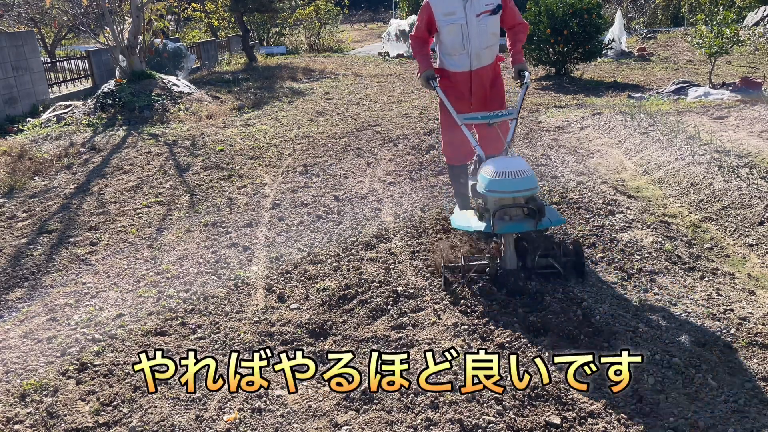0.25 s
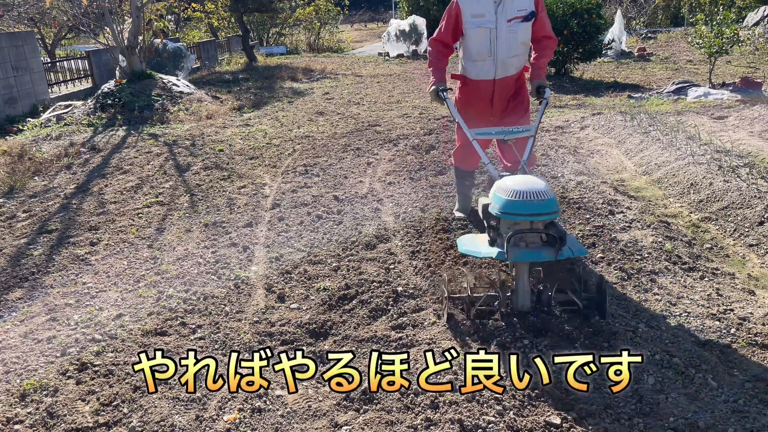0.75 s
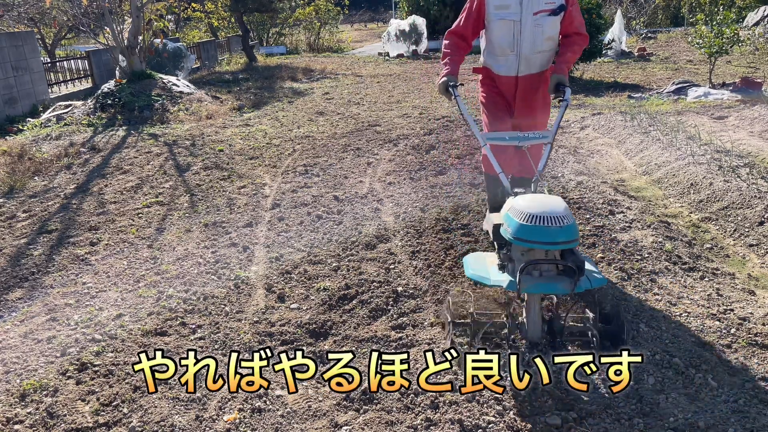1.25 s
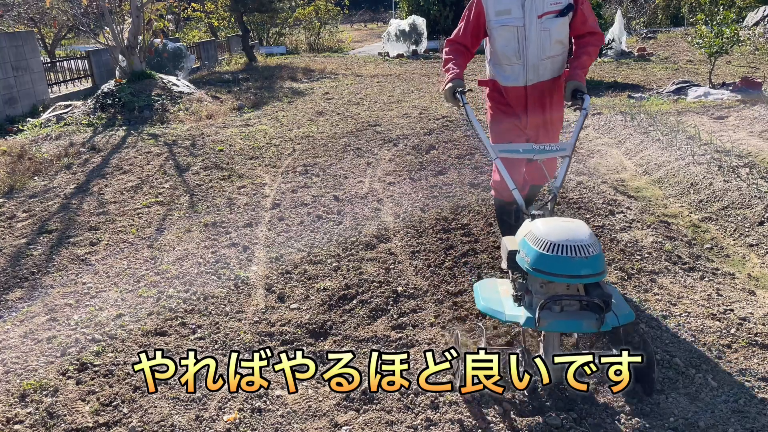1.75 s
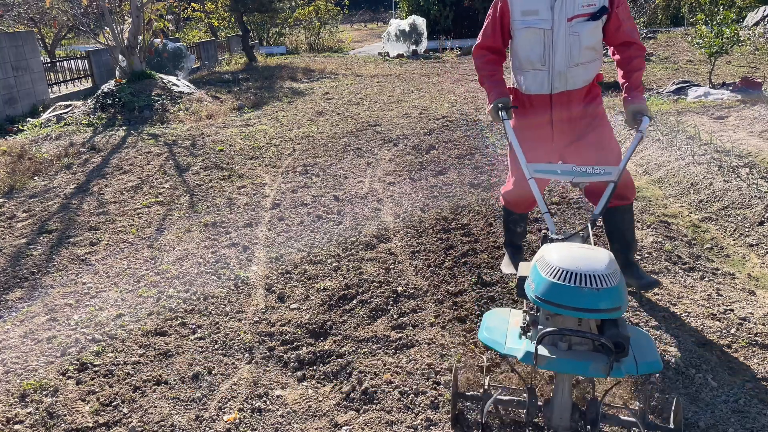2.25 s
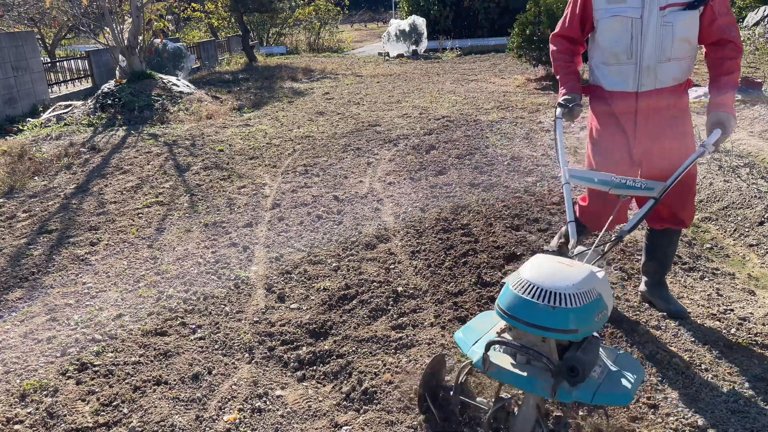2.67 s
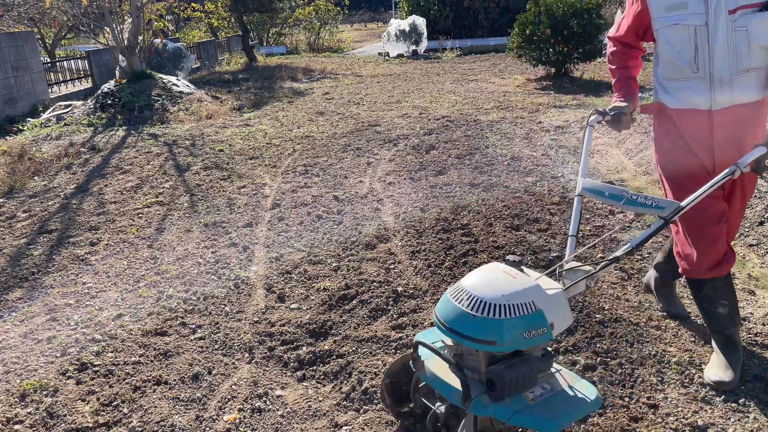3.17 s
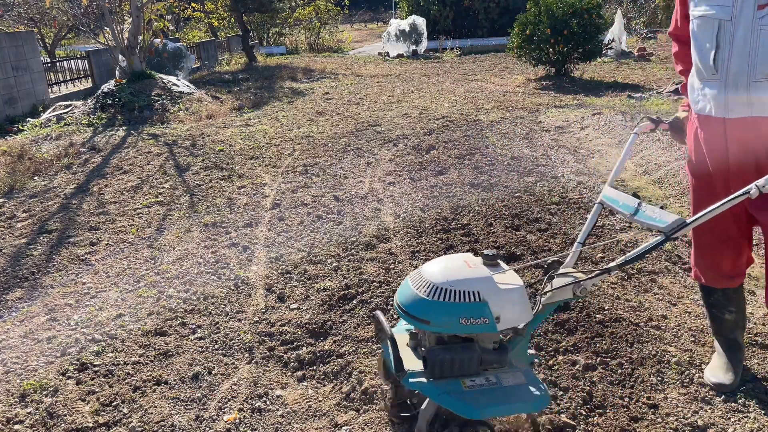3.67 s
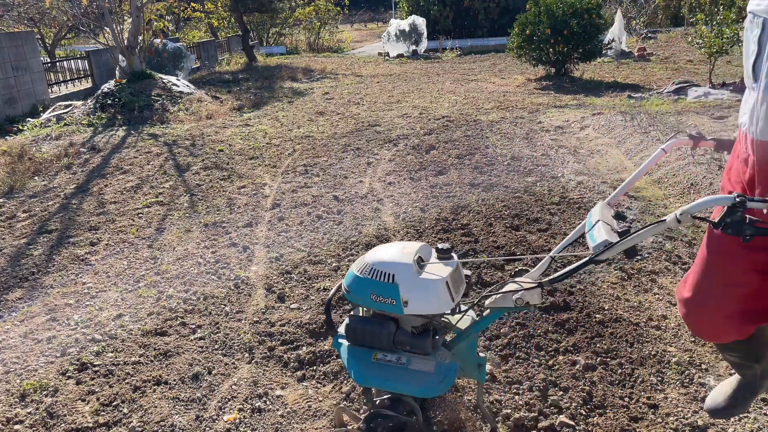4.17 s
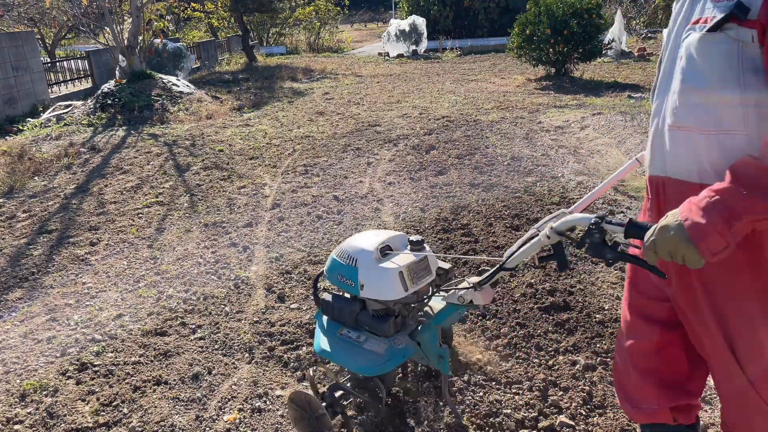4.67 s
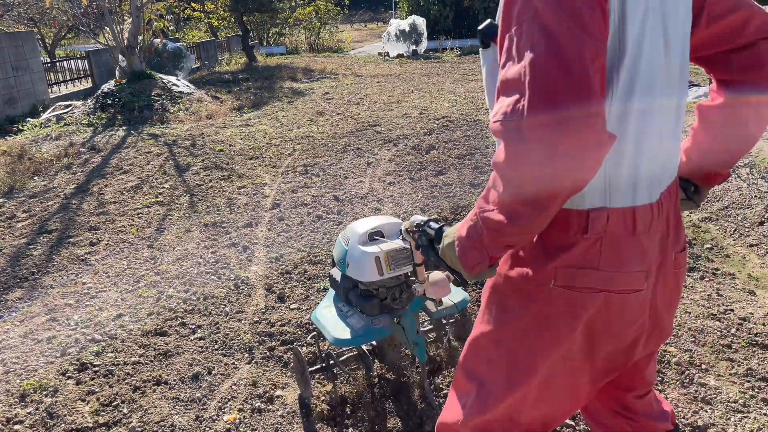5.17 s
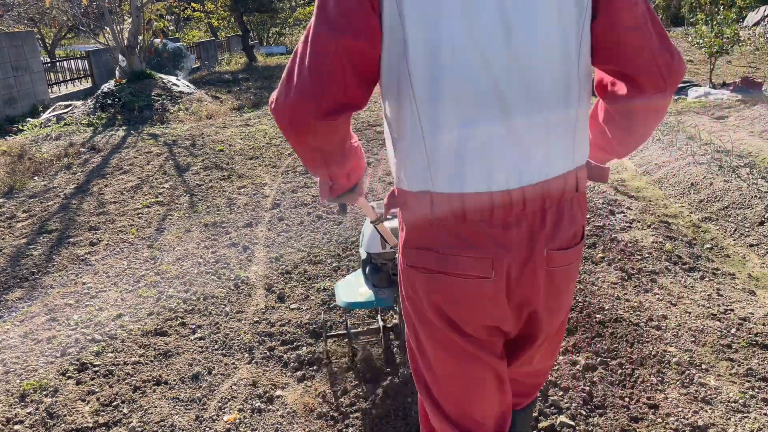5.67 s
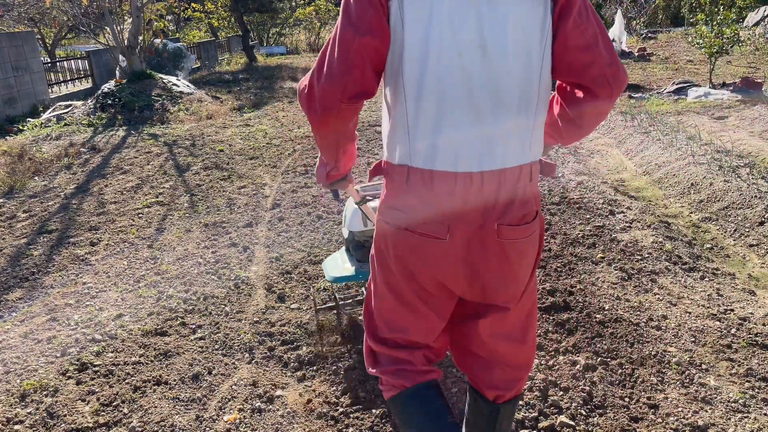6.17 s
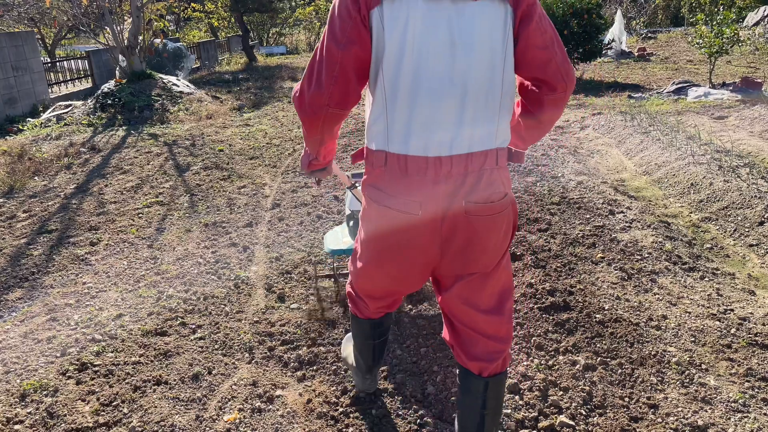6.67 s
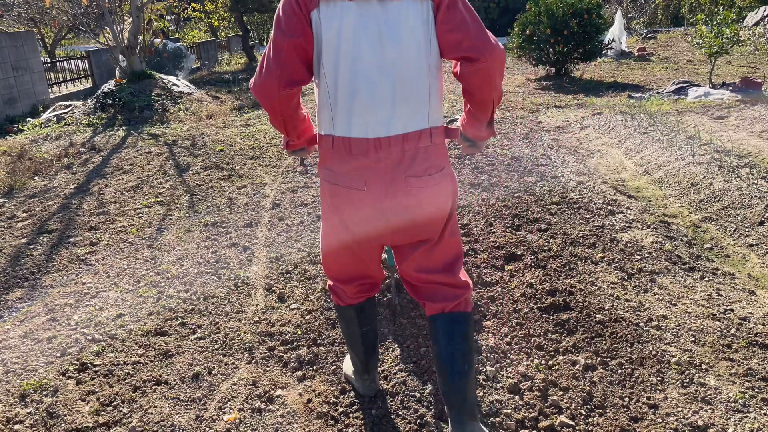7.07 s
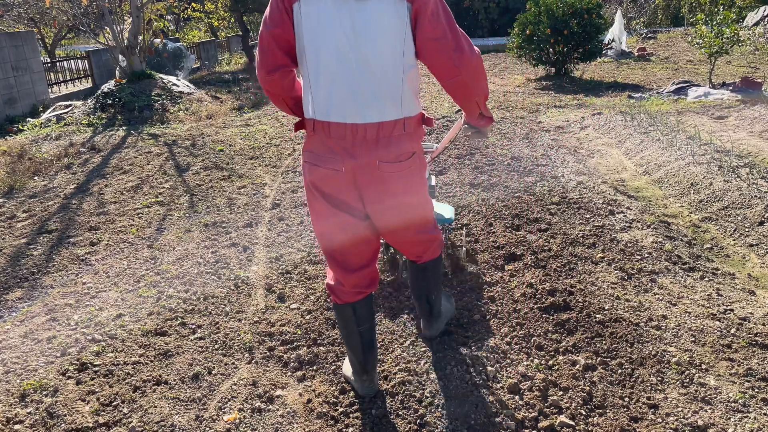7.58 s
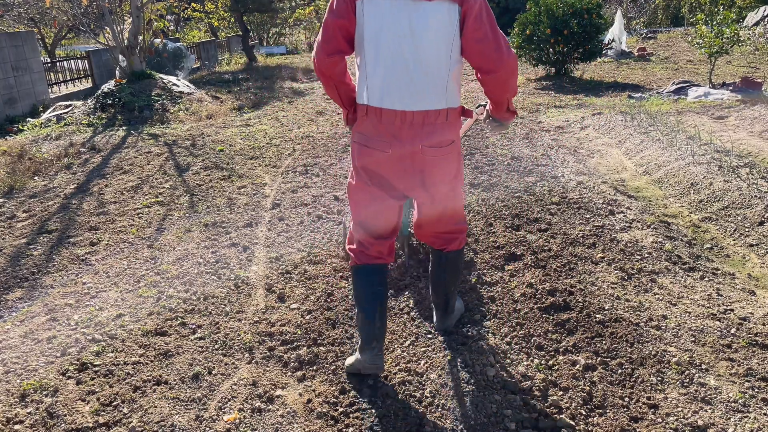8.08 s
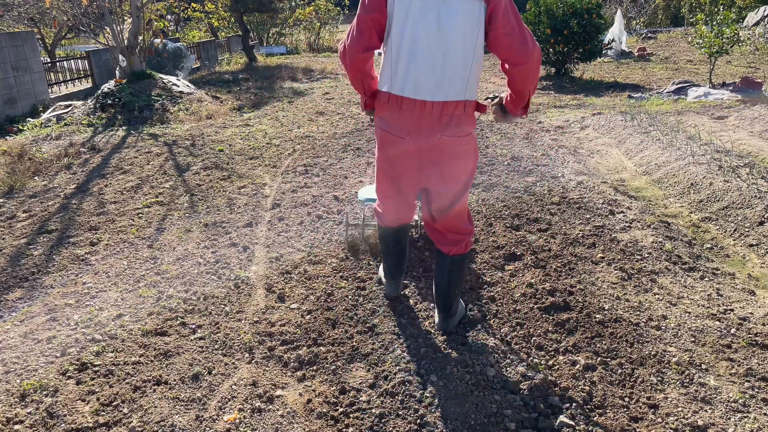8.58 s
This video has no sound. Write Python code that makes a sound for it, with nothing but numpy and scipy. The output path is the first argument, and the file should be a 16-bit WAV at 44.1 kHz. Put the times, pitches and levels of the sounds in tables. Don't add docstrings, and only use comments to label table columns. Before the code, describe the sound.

Rapid single-cylinder engine putter with metallic rattle approaches, cracks brightest as the tiller turns near three seconds, then recedes, quieter and muffled.

```python
import sys
import numpy as np
from scipy import signal
from scipy.fft import rfft, irfft, next_fast_len
from scipy.io import wavfile
from scipy.ndimage import uniform_filter1d

SR = 44100
rng = np.random.default_rng(int(sys.argv[2]) if len(sys.argv) > 2 else 0)


def volts_from_db(level):
    exponent = np.asarray(level, float) / 20
    return 10 ** exponent


def wrap_up_sound(samples):
    columns = np.atleast_2d(samples).T
    tamed = np.clip(columns, -1, 1)
    steps = np.round(tamed * 32767).astype(np.int16)
    wavfile.write(sys.argv[1], SR, steps)


N = 389403
TIME_S = np.arange(N) / SR
SIZE = next_fast_len(N + 2048)
BINS_HZ = np.maximum(np.fft.rfftfreq(SIZE, 1 / SR), 1)


def rms_one(x):
    return x / np.sqrt(np.mean(x ** 2) + 1e-20)


def in_time(rows):
    s, *columns = np.transpose(rows)
    return [np.interp(TIME_S, s, column) for column in columns]


def at_hz(points, hz, column=1):
    points = np.array(points)
    return np.interp(np.log(hz), np.log(points[:, 0]), points[:, column])


def drift(rate_hz):
    r = np.exp(-80 * np.pi * rate_hz / SR)
    slow = signal.lfilter([1], [1, -2 * r, r * r], rng.standard_normal(N // 40 + 2002))
    slow = rms_one(slow[2000:])
    return np.interp(np.arange(N) / 40, np.arange(len(slow)), slow)


# (time [s], casing loudness [dB], tail pipe toward us [0-1], broadside [0-1], hidden by the driver [0-1])
POSE = [(0, -0.5, 0, .1, 0.06), (.7, 0.5, 0.15, 0.11, 0.09), (1.701, 2, 0.12, 0.02, 0.03),
        (2.301, 2, 0.33, 0, 0), (2.9, 3, 0.78, 0.14, 0.11), (3.5, 3.5, 0.69, 0.14, 0.22),
        (4.101, 0.5, 0.74, 0.75, 0.36), (4.8, -0.5, 0.34, 0.8, 0.4), (5.3, -4.5, 0.37, 0.85, 0.04),
        (5.8, -4.5, 0.44, 0.6, 0.92), (6.2, -4.5, 0.05, 0.7, 0.7), (6.6, -4, 0.26, 0.23, 0.8),
        (7.1, -5, 0.17, 0, 0.85), (7.8, -4, 0.2, 0.06, 0.84), (8.55, -4, 0.28, 0.21, 0.96),
        (8.83, -3.5, 0, 0.04, 0.63)]


def posed(head_on, toward, broadside, hidden, power=1):
    s, casing_db, *pose = np.transpose(POSE)
    shares = np.clip(pose, 0, 1.2) ** power
    return np.interp(TIME_S, s, head_on + np.dot([toward, broadside, hidden], shares))


# (time [s], firing rate [firings/s])
SPEED = [(0.0, 30.36), (0.45, 30.66), (1.27, 29.6), (1.62, 31.26), (1.91, 29.8), (2.03, 30.22),
         (3.94, 30.55), (4.05, 29.53), (4.59, 30.6), (4.91, 29.97), (5.84, 30.31), (6.21, 31.36),
         (6.57, 30.26), (6.91, 30.52), (7.06, 29.43), (7.79, 31.0), (8.23, 29.76), (8.83, 30.35)]


def firing_cycles():
    tine_turns_per_s, drag_cycles, angle_rad = 2.654, .0073, .28
    first_firing_cycles = -.019
    tines = np.sin(2 * np.pi * tine_turns_per_s * TIME_S + angle_rad)
    return np.cumsum(in_time(SPEED)[0]) / SR - first_firing_cycles + drag_cycles * tines


def burst(cycles, start_ms, crest_ms, hz, width_hz, uneven_db, jitter_ms, order, count=2):
    chance = rng.standard_normal((300, 2))
    speed = np.gradient(cycles) * SR
    out = np.zeros(N)
    for back in range(count):
        index = np.floor(cycles).astype(int) - back
        since_s = (cycles - index) / speed - jitter_ms * chance[index + 1, 0] / 1000
        fade = np.pi * width_hz * np.maximum(since_s - start_ms / 1000, 0)
        tone = np.cos(2 * np.pi * hz * (since_s - crest_ms / 1000))
        strength = volts_from_db(uneven_db * chance[:, 1])[index + 1]
        out += strength * fade ** order * np.exp(-fade) * tone
    return out / np.sqrt(uniform_filter1d(out ** 2, SR // 2))


# (time [s], level [dB])
BOOM_LEVEL = [(0.0, -14), (0.05, -15.5), (0.42, -14), (1.62, -14), (3.1, -16), (4.1, -20.5), (5.09, -22),
              (6.71, -19.5), (8.73, -20.5), (8.83, -19.5)]


def exhaust(cycles):
    boom = burst(cycles, start_ms=posed(0.77, -1.6, 4.16, 0.31), crest_ms=10.1, hz=posed(171.5, -6, -21, -2),
                 width_hz=posed(180.5, -27, 35, -38.5), uneven_db=.3, jitter_ms=.04, order=4)
    chamber = burst(cycles, 6.0, 14.4, hz=242, width_hz=72, uneven_db=.8, jitter_ms=.06, order=1)
    upper = burst(cycles, 4.2, 12.36, hz=posed(378.5, -6, 22, 41), width_hz=140,
                  uneven_db=0.53, jitter_ms=0.14, order=1, count=1)
    upper = volts_from_db(posed(-10, -4, -5, 8.5)) * upper
    intake = burst(cycles, 26, 32.2, hz=230, width_hz=170, uneven_db=1.2, jitter_ms=.1, order=2)

    third_under_db = posed(19.5, 14, -20.5, 3.7)
    third_lag = np.interp(third_under_db, [13, 21], [.395, .315])
    crank = np.sqrt(2) * np.cos(4 * np.pi * (cycles - .232))
    third = np.sqrt(2) * np.cos(6 * np.pi * (cycles - third_lag))

    parts = volts_from_db(2.5 - posed(15.5, 7.5, -6.8, -2)) * (upper - chamber)
    parts += volts_from_db(-posed(10, -2, 9, 0.5)) * crank
    parts += volts_from_db(-third_under_db) * third
    parts += volts_from_db(-posed(26, 7.2, 7, -17.5)) * intake
    return volts_from_db(in_time(BOOM_LEVEL)[0] + 0.52) * (boom + parts)


# (time [s], peak level [dB])
HARD_FIRINGS = [(2.705, -9), (2.771, -2), (3.034, 6), (3.099, 2), (3.133, -6), (3.265, -11), (3.364, -13),
                (3.431, -2), (3.528, -11), (3.789, -10), (3.822, -14), (3.854, -5), (3.887, -6), (3.92, -1),
                (3.987, -7), (4.02, -5), (4.088, -7), (4.121, 2), (4.155, -7), (4.355, -3), (4.52, -5),
                (4.685, -14), (7.357, -14)]


def crack_and_pop(cycles):
    crack = burst(cycles, 1.7, 1.75, hz=830, width_hz=380, uneven_db=1.3, jitter_ms=.08, order=1, count=1)
    snap = burst(cycles, 2.2, 2.5, hz=1700, width_hz=1500, uneven_db=3.0, jitter_ms=.1, order=1, count=1)
    pop = burst(cycles, start_ms=posed(10.02, 0.33, 0.083, 0.15), crest_ms=11.15, hz=posed(585, -32, 0, 70),
                width_hz=posed(250, -100, 60, 20), uneven_db=1.0, jitter_ms=.05, order=1, count=1)

    s, peak_db = np.transpose(HARD_FIRINGS)
    hard_index = cycles[(s * SR).astype(int) + 200].astype(int)
    extra_db = np.zeros(300)
    extra_db[hard_index] = 3.5 + .5 * (peak_db - np.median(peak_db)).clip(-2, 4)
    crack_db = posed(-32, 2, -0.5, -0.5, power=1.9) + extra_db[cycles.astype(int)] + .8
    pop_db = posed(-33.5, 6.5, -3, -1.3) + 2.2

    casing_db = in_time(POSE)[0]
    return volts_from_db(casing_db) * (volts_from_db(pop_db) * pop - volts_from_db(crack_db) * (crack + volts_from_db(-11) * snap))


def shaking(cycles):
    white = rng.standard_normal((2, SIZE))
    struck = rng.random(SIZE) < 1500 / SR
    knock_db = 3.5 * np.minimum(rng.exponential(1, SIZE), 4)
    knocks = struck * volts_from_db(knock_db) * np.sign(white)
    shake = white + .45 * rms_one(knocks)

    turn = (cycles - .065) % 1
    contacts = signal.lfilter([1], [1, -.8], rng.standard_normal(1456))
    shake[0, :N] += .1 * contacts[(turn * 1456).astype(int)]
    firing = np.exp(-turn / 0.099) + 1.6 * np.exp(-((turn - .5) % 1) / 0.011)
    return shake, firing


# (frequency [Hz], gain with pipe toward us [dB], gain broadside [dB], loss when hidden [dB])
REGIONS = [(424, 6.5, 3.5, 7.5), (720, -9, 1, -3), (1400, -2.3, -0.5, 7.5), (3240, 2.5, 5.5, 2),
           (5500, 0, 4, 5), (8000, 0.5, 2.5, 2.5), (13000, -3.5, 3, 9)]


def region_level(hz):
    casing_db, toward, broadside, hidden = in_time(POSE)
    level_db = casing_db + at_hz(REGIONS, hz) * toward
    level_db += at_hz(REGIONS, hz, column=2) * broadside
    level_db -= at_hz(REGIONS, hz, column=3) * hidden
    return level_db - np.mean(level_db)


# (frequency [Hz], spectral level [dB])
COLOUR = [(40, -30), (170, -20.5), (310, -15), (420, -9), (600, -2.5), (950, -8.5), (1120, -16),
          (1350, -10), (1650, -11), (2200, -11), (3500, -12.5), (6000, -17), (8000, -14), (11000, -23.5),
          (15500, -26)]


def clatter(shake, firing, pan_db):
    alike = at_hz(PORTS, BINS_HZ, column=3)
    mid, side = rfft(shake) * volts_from_db(at_hz(COLOUR, BINS_HZ)) * np.sqrt([1 + alike, 1 - alike])
    ears = np.array([mid + side, mid - side])
    shared = drift(14)
    out = np.zeros((2, N))
    step = np.clip(np.log2(BINS_HZ / 250) * 1.4, 0, 8)
    for k in range(9):
        band = np.cos(np.clip(step - k, -1, 1) * np.pi / 2) ** 2
        gain_db = region_level(250 * 2 ** (k / 1.4))
        gain_db += np.interp(k, [3, 8], [.4, 1.0]) * shared + 1.4 * drift(21.0)
        gain_db += np.interp(k, [1, 8], [2.5, 4.5]) * firing
        out += volts_from_db(gain_db) * irfft(band * ears, SIZE)[:, :N]
        if k == 5:
            out *= volts_from_db(pan_db)
    return volts_from_db(-16.5) * out


# (frequency [Hz], width [Hz], level [dB])
PANELS = [(950, 100, -40), (1250, 80, -40), (1330, 75, -34.5), (1420, 80, -41), (1980, 70, -41),
          (2100, 70, -41), (2280, 65, -41), (2550, 90, -43), (3120, 140, -45), (4360, 170, -50),
          (6000, 200, -52)]


def panels(shake, firing):
    blows = shake[:, :N] * volts_from_db(4.8 * firing)
    out = np.zeros(N)
    for k, (hz, width_hz, level_db) in enumerate(PANELS):
        r = np.exp(-np.pi * width_hz / SR)
        ring = signal.lfilter([1, 0, -1], [1, -2 * r * np.cos(2 * np.pi * hz / SR), r * r], blows[k % 2])
        swell_db = region_level(hz) + 1.6 * drift(1.5) + 1.5 * drift(14)
        out += volts_from_db(level_db + swell_db) * rms_one(ring)
    return out


# (time [s], left-right difference [dB])
PAN = [(0, -1.2), (2, -.9), (3.7, -.6), (4.5, -.1), (6.2, -1.0), (7.2, -.1), (8.83, -.3)]


def direction():
    return in_time(PAN)[0] * [[.5], [-.5]]


# (delay [ms], level [dB], left-right difference [dB])
ECHOES = [
    (9, -21, 12),
    (14, -21, -12),
    (41, -28, 9),
    (58, -28, -9),
]


def echoes(tones):
    dull = signal.sosfilt(signal.butter(2, [210, 2500], "band", fs=SR, output="sos"), tones)
    out = np.zeros((2, N))
    for delay_ms, db, side_db in ECHOES:
        read = np.arange(N) - SR * (delay_ms + 1.05 * drift(0.275)) / 1000
        gain = volts_from_db([[db + side_db / 2], [db - side_db / 2]])
        out += gain * np.interp(read, np.arange(N), dull)
    return out


def ground(x):
    near_dip, far_dip = (315, 50, .45), (540, 55, .55)   # (Hz, width Hz, depth 0-1)
    hidden = np.clip(in_time(POSE)[3] * 1.5, 0, 1)
    for share, (hz, width_hz, depth) in ((1 - hidden, near_dip), (hidden, far_dip)):
        x = x - share * depth * signal.lfilter(*signal.iirpeak(hz, hz / width_hz, fs=SR), x)
    return x


# (time [s], peak level [dB])
TICKS = [(0.2947, -49), (1.0196, -32), (1.2545, -29), (2.0108, -30), (2.7695, -23), (2.8365, -30),
         (2.9033, -28), (3.012, -20), (3.0999, -29), (3.1333, -23), (3.1996, -26), (3.3638, -29),
         (3.432, -23), (3.4625, -25), (3.5922, -25), (3.6581, -26)]


def ticks():
    clicks = np.zeros(N)
    for s, peak_db in TICKS:
        clicks[round(s * SR)] = volts_from_db(peak_db + 8.5)
    fading = signal.lfilter([1], [1, -.985], clicks + 1e-18)
    grit = fading * rng.standard_normal(N)
    return signal.sosfilt(signal.butter(2, 2500, "high", fs=SR, output="sos"), grit)


def scene():
    cycles = firing_cycles()
    pan_db = direction()
    shake, firing = shaking(cycles)
    tones = exhaust(cycles) + crack_and_pop(cycles) + panels(shake, firing)
    machine = tones * volts_from_db(pan_db) + clatter(shake, firing, pan_db) + echoes(tones)
    return ground(machine) + ticks()


# (frequency [Hz], left lag [rad], left-right difference [dB], likeness [0-1])
PORTS = [(150, -.02, 0, .9), (1000, -.1, -.8, .76), (1900, -.16, -.8, .76), (3000, -.7, 2, .74),
         (4300, -.3, 3, .64), (5200, -.55, 4.5, .5), (6100, .2, 2.5, .8), (7000, 1.6, 1.5, .9),
         (8000, 2.95, 0, .985), (8600, 3.4, 0, .985), (9600, 4.6, 0, .9), (11100, 6.15, 0, .99),
         (12300, 6.4, 0, .99), (13300, 7.9, 0, .9), (14500, 9.3, 0, .99)]
# (frequency [Hz], phase [rad])
APPROACH_PHASE = [(60, .1), (150, .2), (300, .38), (1400, .5), (3000, 1.1), (4300, 1.0), (5200, 0)]


def at_ports(dry):
    crossing_s = 3.0, 4.0
    past_half = volts_from_db(at_hz(PORTS, BINS_HZ, column=2) / 2) * np.exp(-.5j * at_hz(PORTS, BINS_HZ))
    near_half = past_half * np.exp(-.5j * at_hz(APPROACH_PHASE, BINS_HZ))
    spectrum = rfft(dry, SIZE)
    near = irfft(spectrum * np.array([near_half, 1 / near_half]), SIZE)[:, :N]
    past = irfft(spectrum * np.array([past_half, 1 / past_half]), SIZE)[:, :N]
    return near + np.interp(TIME_S, crossing_s, [0, 1]) * (past - near)


def roll_off(x):
    return signal.sosfilt(signal.butter(12, 15680, fs=SR, output="sos"), x)


def record(dry):
    rounded = 1.3 * np.tanh(at_ports(dry) / 1.3)
    mix = signal.sosfilt(signal.butter(2, 38, "high", fs=SR, output="sos"), rounded)
    return roll_off(mix)


dry = scene()
out = record(dry)
wrap_up_sound(out)
```